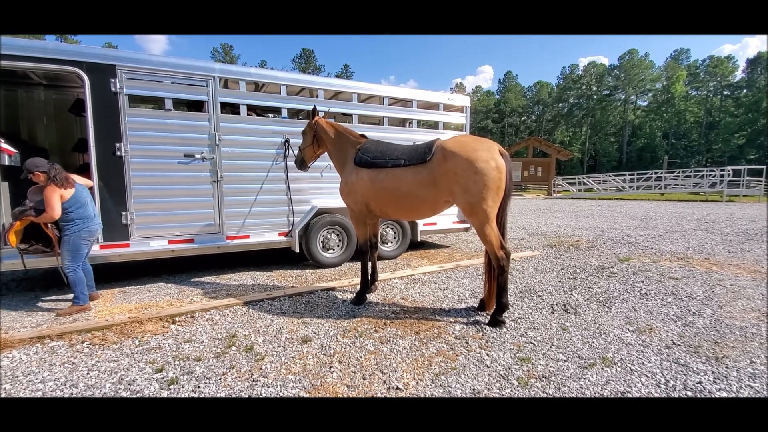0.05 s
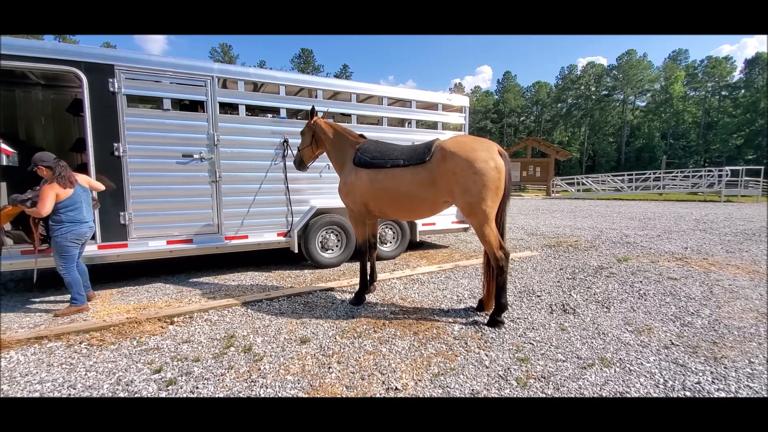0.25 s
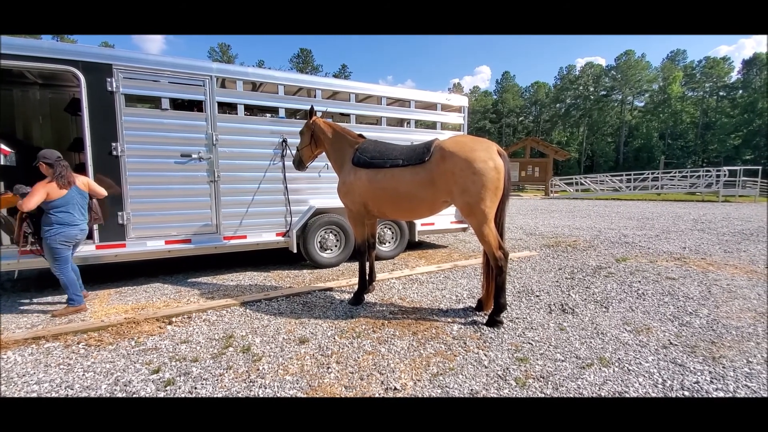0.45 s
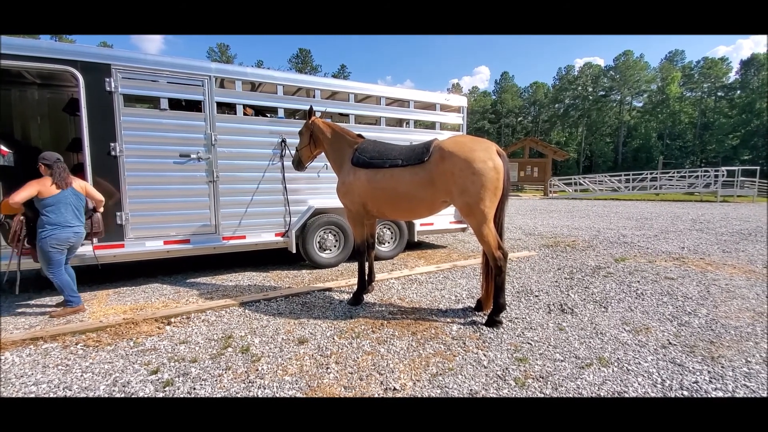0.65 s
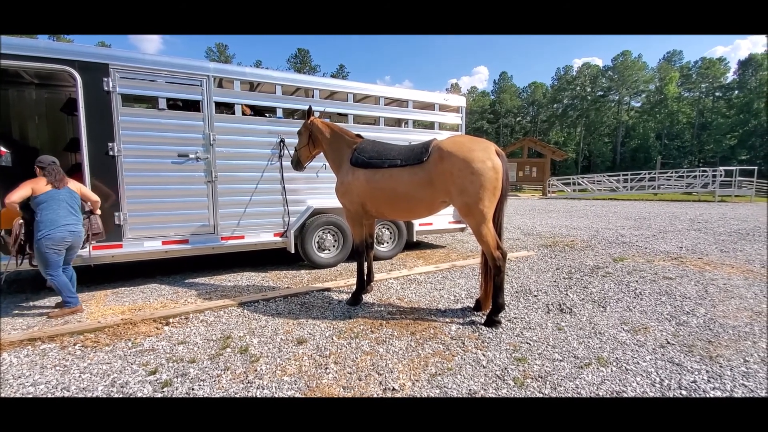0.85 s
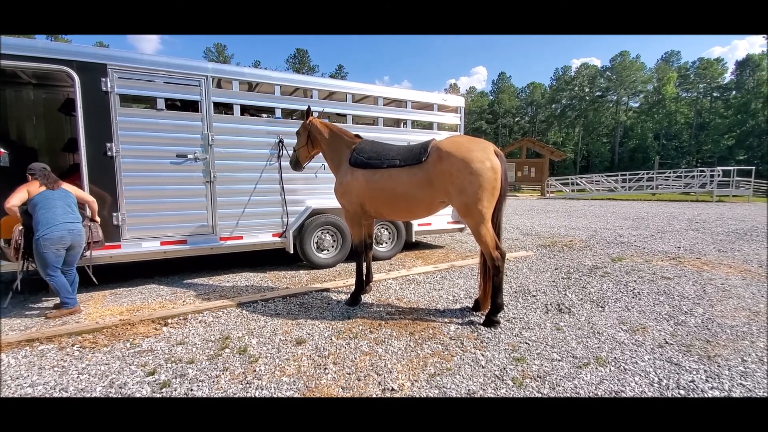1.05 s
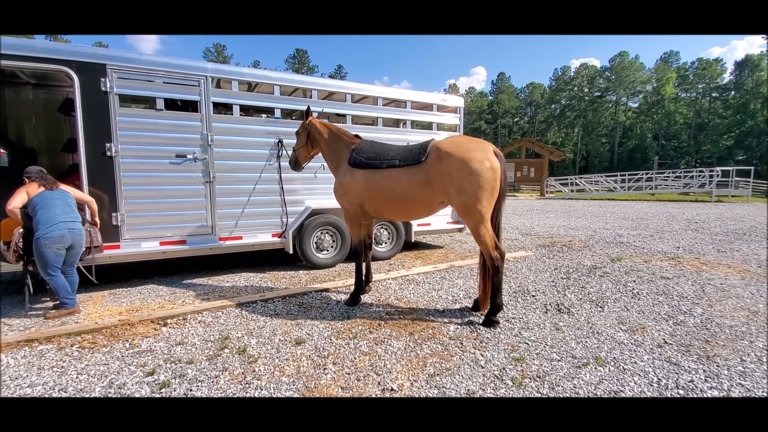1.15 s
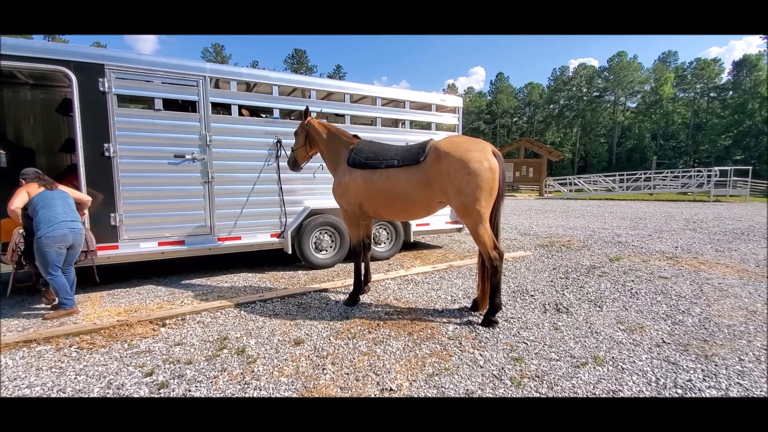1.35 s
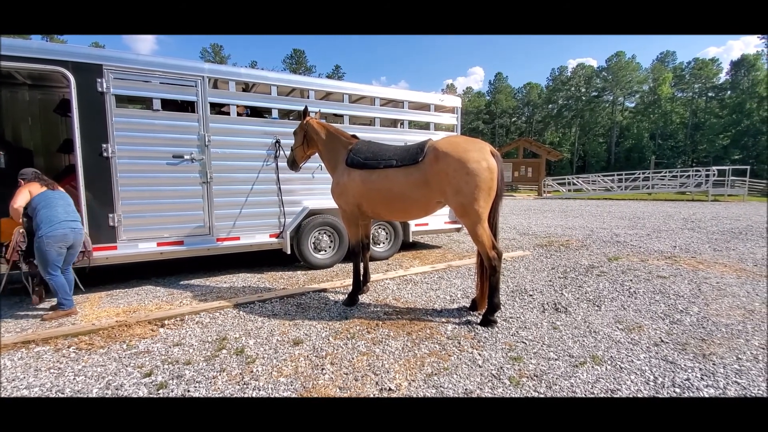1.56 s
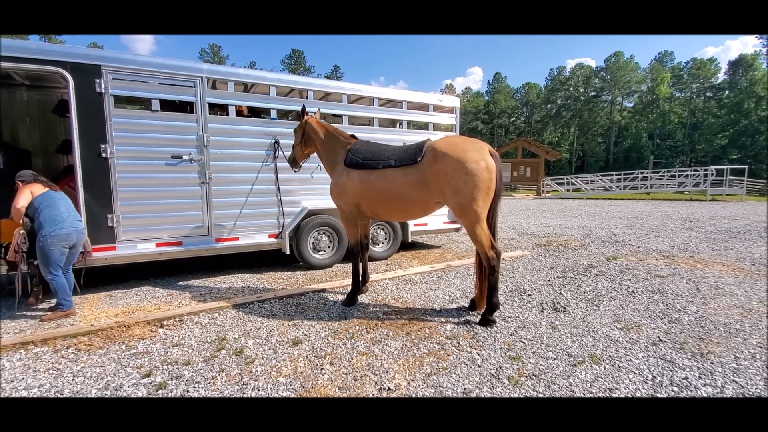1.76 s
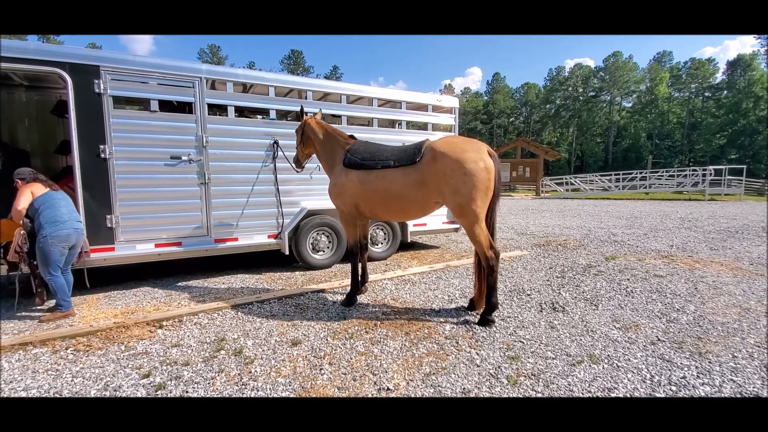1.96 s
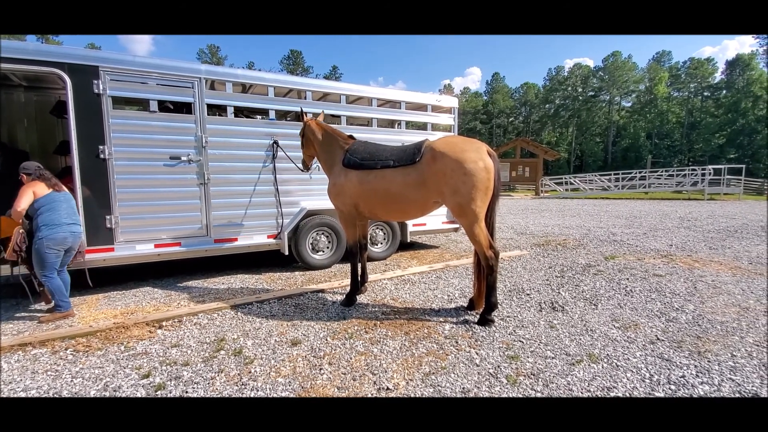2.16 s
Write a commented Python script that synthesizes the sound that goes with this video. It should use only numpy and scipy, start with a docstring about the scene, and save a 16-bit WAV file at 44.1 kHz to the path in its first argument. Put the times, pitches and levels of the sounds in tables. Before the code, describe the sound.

A saddle is handled by a metal trailer in a quiet, faintly humming yard. Leather rubs and creaks from the start, with light bumps around 0.15-0.22 s and a low boom. Loud hollow metal wall knocks hit at 0.4-0.44, a weaker one at 0.56. Strap hiss, dull taps, ticks and buckle clinks scatter from 0.5 to 1.3, a faint stirrup clank at 1.35, ring jingle at 1.5, near quiet, then a soft saddle thud at 2.15.

```python
"""An open yard hums faintly while leather rubs and straps hiss: shaped noise whose level drifts.
A saddle bumps its stand, then knocks a metal trailer wall: decaying modes; booms are the shell's lowest mode.
Ticks, taps and buckle clinks follow as short filtered bursts, then a stirrup clanks and cinch rings jingle,
their modes fed by dense tiny contacts. Last, the saddle lands. Two microphone ports hear it all."""
import sys
import numpy as np
from scipy import signal
from scipy.fft import rfft, irfft, next_fast_len
from scipy.io import wavfile
from scipy.ndimage import uniform_filter1d

SR = 44100
rng = np.random.default_rng(int(sys.argv[2]) if len(sys.argv) > 2 else 0)


def put_to_file(sound):
    """Save the sound as 16-bit audio at rate SR, in the file named by the first command-line argument."""
    columns = np.atleast_2d(sound).T  # one column per channel
    safe = np.clip(columns, -1, 1)
    whole_steps = np.round(safe * 32767)
    wavfile.write(sys.argv[1], SR, whole_steps.astype(np.int16))


N = 97020  # samples, 2.2 s


def amp(db):
    """Decibels express an amplitude ratio logarithmically."""
    return 10 ** (np.asarray(db) / 20)


def evened(x):
    """Normalization to unit rms fixes the power of a signal."""
    return x / np.sqrt(np.mean(x ** 2) + 1e-20)


def read(points, hz):
    """A spectrum is interpolated along a logarithmic frequency axis."""
    f, value = np.transpose(points)
    return np.interp(np.log(hz + 1), np.log(f + 1), value)


def add(mix, s, sound):
    """Superposition: a sound is summed into the mix from s seconds on."""
    part = mix[round(s * SR):][:len(sound)]
    part += sound[:len(part)]


def gate(s, length, rise_s, t60):
    """An envelope rises linearly from s, holds until s + length, then decays exponentially."""
    t = np.arange(N) / SR - s
    return np.clip(t / rise_s, 0, 1) * amp(-60 * np.maximum(t - length, 0) / t60)


def resonate(x, hz, width_hz):
    """A one-pole complex resonator of about unit peak gain; damping sets its bandwidth."""
    r = np.exp(-np.pi * width_hz / SR)
    return 2 * signal.lfilter([1 - r], [1, -r * np.exp(2j * np.pi * hz / SR)], x).real


def noise(spectrum, size, patchy_db, flicker_db):
    """Random short-time spectra with drifting patches and a flicker shared by all bins, rms 1."""
    hz = np.fft.rfftfreq(size, 1 / SR)
    real, imag, patches = rng.standard_normal((N * 4 // size + 12, len(hz), 3)).T
    flicker = evened(uniform_filter1d(patches[0], size=3))
    # smoothing over 8 frames and 8 bins makes the patches
    patches = uniform_filter1d(patches, size=8, axis=0)
    patches = evened(uniform_filter1d(patches, size=8, axis=1))
    level_db = read(spectrum, hz)[:, None] + patchy_db * patches + flicker_db * flicker
    frames = (real + 1j * imag) * amp(level_db)
    sound = signal.istft(frames, nperseg=size, noverlap=size * 3 // 4)[1]
    return evened(sound[size:size + N])


def strikes(events, modes):
    """Modal synthesis: blows swell slightly detuned modes over a dying rattle, weaker for dull blows."""
    # dense rattle under each blow, relative density: frequency_hz, level_db (per Hz)
    thud = [(60, -16.5), (200, 5), (500, -4.5), (800, -13), (1900, -12.5), (3300, -24.5), (6000, -36),
            (15500, -56)]
    thud_db, thud_t60 = -13.5, 0.13  # rattle level before the blow's own level and tilt; decay in s
    out, t = np.zeros(N), np.arange(SR // 2) / SR
    rattle = noise(thud, size=256, patchy_db=5.5, flicker_db=3.5)
    hz, db, t60 = np.transpose(modes)[:, :, None]
    for s, level_db, tilt_db, rise_s in events:
        detune = 1 + 0.024 * (rng.random((len(modes), 1)) - .5)  # within 1.2 percent
        gains = amp(db + tilt_db * np.log2(hz / hz[0]))  # tilt pivots on the first listed mode
        ring = gains * amp(-60 * t / t60) * np.sin(2 * np.pi * hz * detune * t)
        swell = 1 - np.exp(-t / rise_s)
        add(out, s, amp(level_db) * swell * ring.sum(0) / np.linalg.norm(gains))
        out += amp(level_db + thud_db + tilt_db) * gate(s, 2 * rise_s, rise_s, thud_t60) * rattle
    return out


def shakes(events, modes, width_hz):
    """Random impulse excitation: dense tiny contacts keep broad modes shimmering, each mode on its own."""
    contacts_per_s = 4600
    shape = (len(modes), N)
    contacts = (rng.random(shape) < contacts_per_s / SR) * rng.standard_normal(shape)
    metal = np.zeros(N)
    for x, (hz, db) in zip(contacts, modes):
        metal += amp(db) * resonate(resonate(x, hz, width_hz), hz, 4 * width_hz)
    envelope = sum(amp(db) * gate(s, length, 0.0005, t60) for s, length, db, t60 in events)
    return evened(metal) * envelope


def yard_hum():
    """Ambient noise: a steady random field with a coloured spectrum and gentle flicker."""
    # yard spectrum, relative density: frequency_hz, level_db (per Hz)
    yard = [(30, -20), (80, 7.5), (155, -2.5), (300, -19), (550, -19.5), (750, -47.5), (2300, -22),
            (3300, -26), (6500, -40), (13000, -38)]
    yard_db = -63.5  # rms before the ports
    return amp(yard_db) * noise(yard, size=2048, patchy_db=-2.0, flicker_db=-3.4)


def rubbing():
    """Friction noise: dragged leather gives a low body and a creak; sliding straps give a fine hiss."""
    # leather rubbing: time_s, body_db, creak_db
    rub = [(0, -41, -57), (0.07, -44.5, -56), (.13, -55, -57), (0.226, -44, -51.5), (0.326, -50.5, -65),
           (.65, -48.5, -59.5), (.9, -56, -65), (1.301, -58.5, -68), (1.45, -64, -72), (1.95, -67, -74),
           (2.2, -54, -62)]
    # low body of the rub, relative density: frequency_hz, level_db (per Hz)
    body = [(45, -2), (200, -9.5), (450, -11), (620, -17), (800, -26), (1500, -53.5)]
    # creak of the rub, relative density: frequency_hz, level_db (per Hz)
    creak = [(400, -2), (600, -11.5), (1100, -2.5), (1900, -3.5), (3100, -22.5), (10000, -30)]
    # strap slides: start_s, length_s, level_db
    slides = [(0, 0.16, -75), (.15, 0.19, -77), (0.383, 0.065, -59.5), (0.499, 0.038, -62.5),
              (0.533, 0.078, -60), (0.656, 0.22, -65), (1.047, 0.067, -74), (1.976, 0.088, -70.5)]
    # strap hiss, relative density: frequency_hz, level_db (per Hz)
    strap = [(2500, -3), (4000, -15.5), (6000, -10), (11000, -9), (15600, -15)]
    slide_edge_s = 0.026
    t, (s, body_db, creak_db) = np.arange(N) / SR, np.transpose(rub)
    low = amp(np.interp(t, s, body_db)) * noise(body, size=1024, patchy_db=0.0, flicker_db=0.5)
    creaking = amp(np.interp(t, s, creak_db)) * noise(creak, size=256, patchy_db=-2.5, flicker_db=-1.5)
    sliding = sum(amp(db) * gate(start, length, slide_edge_s, 0.05) for start, length, db in slides)
    hiss = sliding * noise(strap, size=128, patchy_db=2.5, flicker_db=3.0)
    return low + creaking + hiss


def stand_bumps():
    """Impact excitation: light bumps set the modes of the saddle stand ringing."""
    # stand modes: frequency_hz, level_db (relative), t60_s
    stand = [(466, -4, 0.15), (743, -9.5, 0.11), (1379, 3.5, 0.047), (1697, -6.5, 0.073),
             (2660, -21, 0.036)]
    # bumps: start_s, level_db, tilt_db (per octave), rise_s
    bumps = [(.142, -37.5, 2.5, 0.0052), (.192, -38, 4, 0.0031), (.207, -30, -1, 0.00076),
             (.222, -35, 1.5, 0.0021)]
    return strikes(bumps, stand)


def booms():
    """Fundamental resonance: the whole trailer shell shudders at its lowest mode."""
    # booms: start_s, level_db
    shudders = [(0.216, -40.5), (0.677, -38.5), (0.97, -50.5), (1.251, -55), (2.109, -54.5)]
    boom_hz, boom_t60, rise_s = 40.4, 0.63, 0.0013  # Hz, s, s
    out, t = np.zeros(N), np.arange(SR) / SR
    for s, db in shudders:
        swell = 1 - np.exp(-t / rise_s)
        add(out, s, amp(db - 60 * t / boom_t60) * swell * np.sin(2 * np.pi * boom_hz * t))
    return out


def wall_knocks():
    """Plate modes: knocks make the metal trailer wall ring at its own frequencies."""
    # wall modes: frequency_hz, level_db (relative), t60_s
    wall = [(201, -1, 0.28), (303, -14, 0.42), (435.8, 4, 0.2), (471, -16, 0.38), (643.3, -7.5, 0.11),
            (1050, -43, 0.19), (1141, -21.5, 0.2), (1438, -12.5, 0.15), (1870, -10, 0.074),
            (2240, -17.5, 0.04), (149.5, -18, 0.264)]
    # knocks: start_s, level_db, tilt_db (per octave), rise_s
    knocks = [(.398, -18, 1, 0.0053), (.4085, -19, -2, 0.0069), (.436, -24, -13.5, 0.0016),
              (.557, -31, -9.5, 0.0041), (.927, -51, 10, 0.0095)]
    return strikes(knocks, wall)


def ticks():
    """Transient and resonance: a noise snap with a weaker fizz after it, and a brief decaying tone."""
    # ticks: time_s, level_db, pitch_hz
    tick_events = [(0.5147, -56.5, 11000), (0.5292, -56, 8800), (0.6778, -55, 4360), (0.843, -52, 8760),
                   (1.071, -58.5, 3480), (1.0934, -73, 4800), (1.138, -68, 8600), (1.355, -55, 5650),
                   (2.148, -55.5, 10720)]
    tick_t60 = .02  # s
    out, t = np.zeros(N), np.arange(4000) / SR
    # snap and after-fizz: levels relative to each other, time constants 0.6 and 8 ms
    fading = amp(4) * np.exp(-t / .0006) + amp(-8) * np.exp(-t / .008)
    for s, db, hz in tick_events:
        fizz = resonate(rng.standard_normal(4000), hz, 12000) * fading
        tone = amp(-60 * t / tick_t60) * np.sin(2 * np.pi * hz * t)
        add(out, s - .0005, amp(db) * (.5 * fizz + tone))
    return out


def taps():
    """Damped resonance: a dull tap is a noise puff with one broad pitch."""
    # taps: time_s, level_db, pitch_hz
    tap_events = [(0.652, -55, 570), (0.684, -50.5, 1376), (0.711, -54, 1760), (0.834, -50.5, 1770),
                  (1.065, -52.5, 1160), (1.07, -54, 1890), (1.091, -56, 2060), (1.113, -55.5, 1470),
                  (1.169, -60, 1120), (1.193, -54, 1090), (1.243, -58.5, 1400), (1.259, -76, 1500),
                  (1.322, -53, 1710), (2.148, -50.5, 1820), (2.166, -53.5, 1850)]
    tap_t60, width_hz, skirt_hz = 0.06, 200, 1800  # decay in s; pitch and wide skirt bandwidths
    out, t = np.zeros(N), np.arange(4000) / SR
    for s, db, hz in tap_events:
        puff = rng.standard_normal(4000)
        pitched = evened(resonate(puff, hz, width_hz))
        skirt = evened(resonate(resonate(puff, hz, skirt_hz), hz, skirt_hz))
        envelope = amp(db - 60 * t / tap_t60) * np.minimum(t / 0.0017, 1)
        add(out, s - .002, envelope * (0.6 * pitched + 0.3 * skirt))
    return out


def clinks():
    """Narrow-band noise: lone buckle tones waver as they decay, each cut after 0.09 s."""
    # buckle tones: start_s, level_db, pitch_hz, t60_s
    buckles = [(.72, -64, 9260, 0.085), (.724, -70, 6600, 0.14), (1.252, -72.5, 6280, 0.43),
               (1.253, -65.5, 14300, 0.15)]
    out, t = np.zeros(N), np.arange(4000) / SR
    for s, db, hz, t60 in buckles:
        tone = evened(resonate(rng.standard_normal(4000), hz, width_hz=120))
        add(out, s, amp(db - 60 * t / t60) * tone)
    return out


def stirrup_clank():
    """Modes under random contact: the stirrup iron clanks."""
    # stirrup modes: frequency_hz, level_db (relative)
    stirrup = [(2250, -1), (3700, -6), (5300, 3), (5700, 1), (13000, -7)]
    # clanks: start_s, length_s, level_db, t60_s
    clanks = [(1.354, 0.019, -59.5, 0.2)]
    return shakes(clanks, stirrup, width_hz=500)


def ring_jingle():
    """Modes under random contact: the cinch rings jingle."""
    # ring modes: frequency_hz, level_db (relative)
    rings = [(6670, 1.5), (9250, -2), (10400, -2), (11880, -0.5), (13200, -3), (14200, 1)]
    # jingles: start_s, length_s, level_db, t60_s
    jingles = [(1.492, 0.035, -62.5, 0.13)]
    return shakes(jingles, rings, width_hz=340)


def saddle_landing():
    """Impact excitation: the landing saddle sounds its own set of damped modes."""
    # landing modes: frequency_hz, level_db (relative), t60_s
    seat = [(212, -0.5, .3), (353.6, 3, 0.11), (536, 1.5, .1), (786, -8.5, 0.095), (1790, -14, 0.053)]
    # landings: start_s, level_db, tilt_db (per octave), rise_s
    landings = [(2.151, -34.5, -0.5, 0.0056), (2.172, -38, -18, .004)]
    return strikes(landings, seat)


def rustle():
    """Superposition of the noisy handling: friction and shaken metal."""
    return rubbing() + stirrup_clank() + ring_jingle()


def blows():
    """Superposition of everything that strikes."""
    return stand_bumps() + booms() + wall_knocks() + ticks() + taps() + clinks() + saddle_landing()


def ports(x, other, likeness, lean_share):
    """Partial coherence: two ports differ in phase and shading; the unlike share comes from other."""
    # phase lead of the left port: frequency_hz, lead_rad
    lead = [(0, 0), (520, .45), (620, 1.1), (700, 3), (1050, 7.5), (1500, 8.5), (1800, 11.4), (2600, 12.8),
            (5000, 24), (16000, 60)]
    # shading at a lean share of 1: frequency_hz, left_minus_right_db
    shading = [(250, 0), (400, -3), (650, -9), (950, 4), (1150, 3), (1600, -8), (2150, 5), (3000, -1),
               (5500, -6), (14000, -1)]
    size = next_fast_len(N + 4096)
    hz = np.fft.rfftfreq(size, 1 / SR)
    same = np.clip(read(likeness, hz), 0, 1)
    lean = amp(lean_share * read(shading, hz) / 2)
    left = rfft(x, size)
    delayed = left * np.exp(-1j * np.interp(hz, *np.transpose(lead)))
    right = same * delayed + np.sqrt(1 - same ** 2) * rfft(other, size)
    return irfft(np.array([left * lean, right / lean]), size)[:, :N]


def scene():
    """Superposition at the ports: yard, handling and blows, each with its own coherence."""
    # coherence of the yard: frequency_hz, common_share
    yard_same = [(150, 0.85), (600, 0.04), (4000, 0.022)]
    # coherence of the handling: frequency_hz, common_share
    near_same = [(400, 0.95), (700, 0.29), (2500, 0.067), (14000, 0.04)]
    # coherence of the blows: frequency_hz, common_share
    blow_same = [(600, 1), (800, .85)]
    yard = ports(yard_hum(), yard_hum(), yard_same, lean_share=0.74)
    handling = ports(rustle(), rustle(), near_same, lean_share=0.65)
    struck = ports(blows(), blows(), blow_same, lean_share=1)
    return yard + handling + struck


def record(dry):
    """Linear filtering: the microphone housing dips one treble band, then a low-pass limits the band."""
    notch_hz, notch_width_hz, notch_db, edge_hz = 8250, 550, -8, 15790
    hz = np.fft.rfftfreq(N, 1 / SR)
    dip_db = notch_db * np.exp(-((hz - notch_hz) / notch_width_hz) ** 2)
    dipped = irfft(rfft(dry) * amp(dip_db), N)
    low_pass = signal.firwin(2047, edge_hz, window=("kaiser", 9), fs=SR)
    return signal.oaconvolve(dipped, low_pass[None], "same")


dry = scene()
out = record(dry)
put_to_file(out)
```